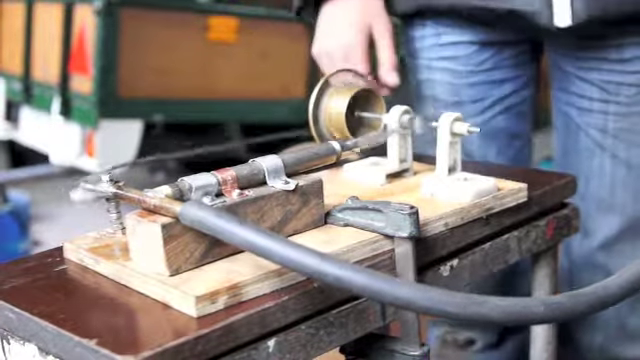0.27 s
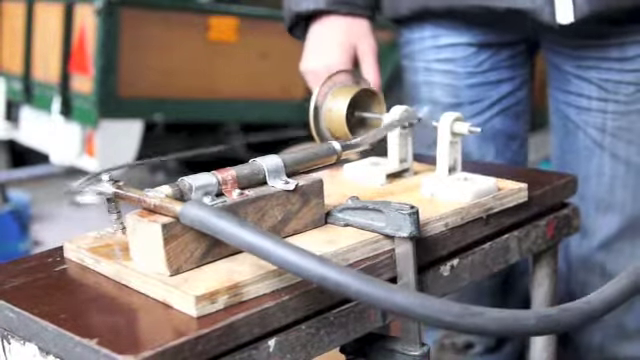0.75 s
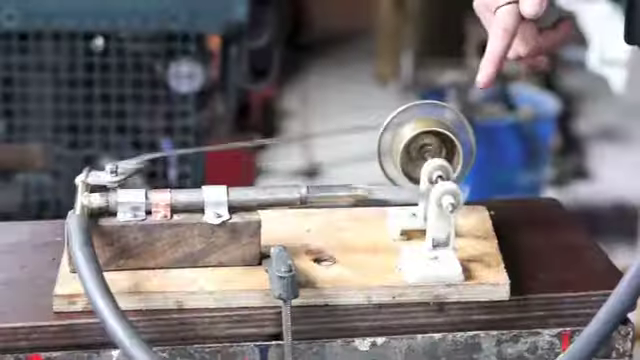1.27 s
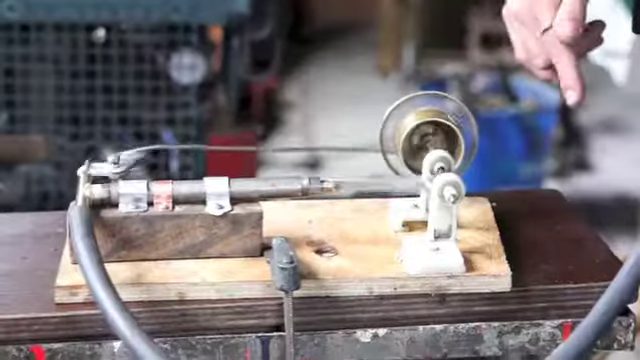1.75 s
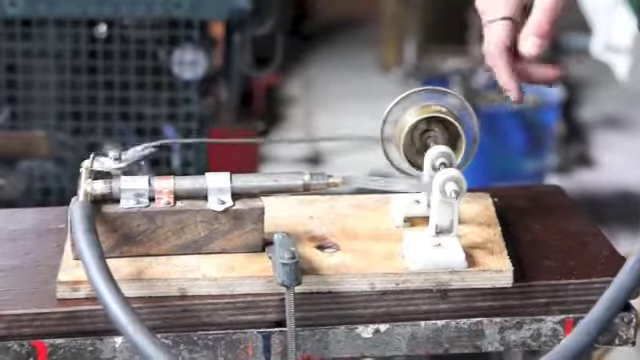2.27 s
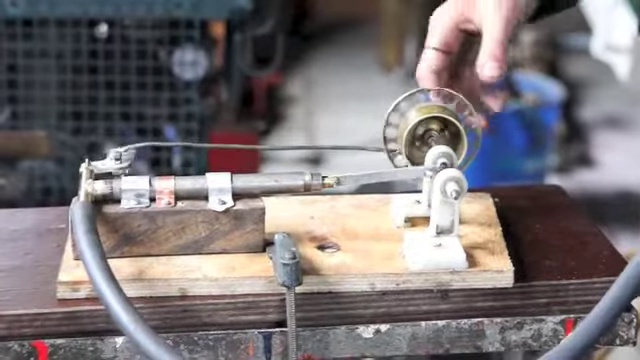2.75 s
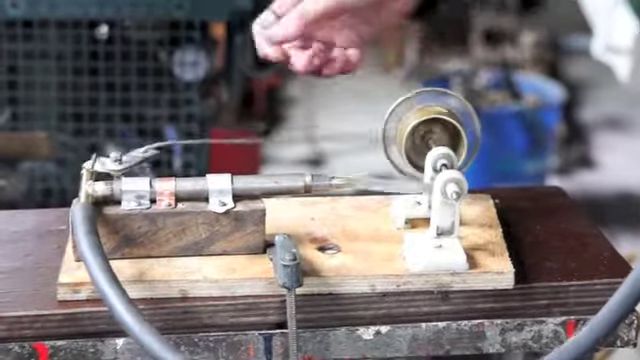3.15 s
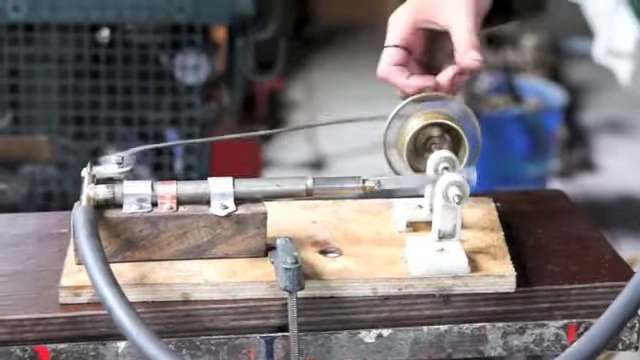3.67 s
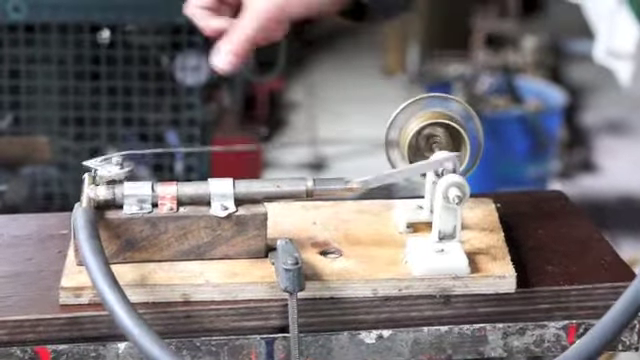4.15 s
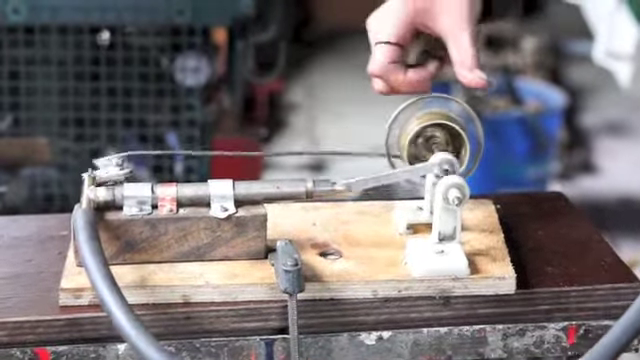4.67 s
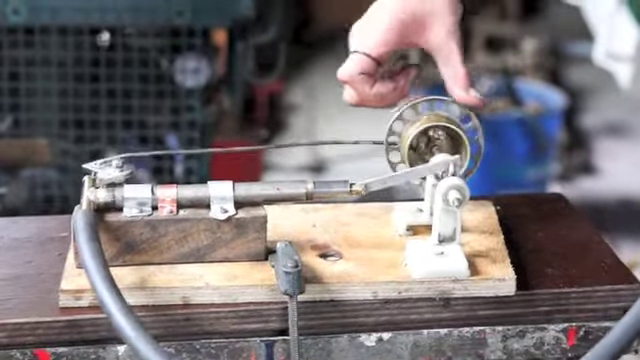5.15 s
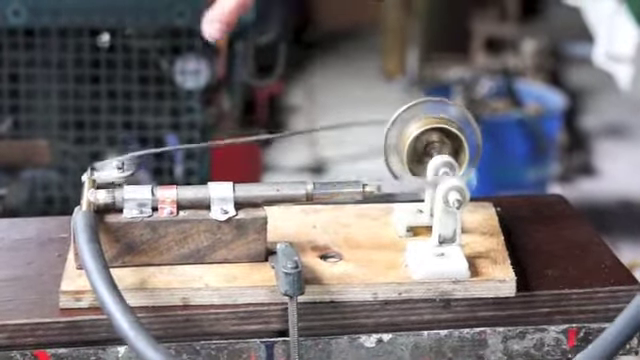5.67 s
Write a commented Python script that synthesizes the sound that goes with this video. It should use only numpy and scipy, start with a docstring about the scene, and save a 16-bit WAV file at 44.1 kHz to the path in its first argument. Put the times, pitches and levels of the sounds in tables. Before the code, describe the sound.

A homemade single-cylinder engine on compressed air, close up in a workshop. For almost a second it races at about eight turns a second, sputtering and knocking. Sound dips nearly to nothing, then it labours: puff, loose metal rattle, hollow rasp and a high squeak per stroke, slowing into two stalls with only leaking hiss. A long stroke hangs late, then quick turns resume. Close stereo microphone, soft reflections.

```python
"""A homemade single-cylinder engine runs on compressed air, clamped to a workshop table.
It races at first, with sputtering air made of sliding resonances; then all sound dips briefly.
Next it labours: each turn has a noise puff, a rattle of random contacts, a hollow rasp and a short squeak.
It stands still twice, leaving the hiss of leaking air, and once a stroke hangs midway before it turns on.
Soft reflections of the workshop and a faint room noise lie around it all."""
import sys
import numpy as np
from scipy import signal
from scipy.fft import rfft, irfft, next_fast_len
from scipy.io import wavfile
from scipy.ndimage import map_coordinates

SR = 44100
rng = np.random.default_rng(int(sys.argv[2]) if len(sys.argv) > 2 else 0)


def inscribe(sig):
    """Save sig as 16-bit PCM at rate SR to the path in sys.argv[1].

    A 1-D sig is mono; a 2-D sig holds one channel per row.
    Samples are clipped to [-1, 1] before scaling.
    """
    pcm = np.round(np.clip(np.atleast_2d(sig).T, -1, 1) * 32767)
    wavfile.write(sys.argv[1], SR, pcm.astype(np.int16))


N = 260180
T = np.arange(N) / SR  # time of every sample in seconds

# Labouring turns. Each row: valve opens in seconds, stroke ends in seconds, then relative levels in dB
# of the puff, port whistle, rattle, piston rasp and squeak.
TURNS = [(1.016, 1.113, -26.5, -27.5, -37, -34, -42), (1.183, 1.261, -26.5, -34, -35.5, -34, -29),
         (1.349, 1.437, -28.5, -50, -35.5, -35, -40), (1.518, 1.604, -30, -32, -36, -38, -29),
         (1.694, 1.787, -29, -38, -34.5, -35, -22.5), (1.893, 2.001, -29.5, -32.5, -34.5, -33, -14.5),
         (2.122, 2.248, -34.5, -39, -36.5, -32.5, -14), (2.399, 2.594, -34, -42, -36.5, -30.5, -5.5),
         (3.069, 3.17, -30.5, -30, -34, -36.5, -27.5), (3.267, 3.358, -31, -50, -36, -34.5, -17.5),
         (3.462, 3.58, -30, -47, -35.5, -34.5, -13.5), (3.724, 3.895, -34.5, -38, -37, -31, -5.5),
         (4.163, 4.261, -32, -28.5, -39.5, -33.5, -22), (4.371, 4.485, -30, -45, -37.5, -33.5, -10),
         (4.614, 4.752, -30, -28.5, -38, -31.5, -7.5), (4.943, 5.369, -34.5, -47, -38, -27.5, -39),
         (5.414, 5.485, -26.5, -27.5, -32.5, -33.5, -45), (5.573, 5.664, -29, -33, -34, -36, -42),
         (5.731, 5.813, -29.5, -46, -34.5, -32.5, -29), (5.897, 5.98, -34, -46, -36, -35, -45)]
OPENS, ENDS, PUFF_DB, WHISTLE_DB, RATTLE_DB, RASP_DB, SQUEAK_DB = np.transpose(TURNS)
# Times when the flywheel stands still. Each row: start in seconds, end in seconds.
STALLS = [(2.72, 3.038), (4.0, 4.112)]
HANG_S = .3  # a stroke longer than this hangs midway

# The racing engine opens its valve at an even pace.
RACE_FIRST_S, RACE_TURN_S, RACE_END_S = 0.036, .1213, .93
RACE_OPENS = np.arange(RACE_FIRST_S, RACE_END_S, RACE_TURN_S)
RACE_THUMP_LAG_S = .022  # from each opening to the thump of the table
# Levels while racing. Each row: time in seconds, then relative levels in dB of the sputter,
# the bracket's ring and the rushing air.
RACE = [(0.0, -31.5, -37, -28), (0.2, -32, -30, -28), (0.3, -32, -41, -28), (0.66, -33.5, -40, -29),
        (0.734, -31.5, -31, -30), (0.79, -34, -44, -29), (0.888, -42, -47, -32.5), (0.9, -50, -53, -32)]
# Puffs of the racing turns, in order. Each entry: relative level in dB.
RACE_PUFF_DB = np.array([-25.5, -28.0, -26.5, -27.0, -30, -27.5, -28.5, -40])
# Fits of the port whistle while racing. Each row: time in seconds, relative level in dB.
RACE_WHISTLES = [(.065, -33), (.1, -33), (.18, -29), (.235, -20), (.372, -27), (.505, -34), (.61, -31),
                 (.655, -32), (.752, -34), (.882, -31)]

# Knocks that shake the linkage. Each row: time in seconds, relative level in dB.
KNOCKS = [(0.017, -15), (0.047, -17), (.102, -10.5), (0.228, -16), (.247, -19), (.262, -16), (.338, -17),
          (.404, -13.5), (0.462, -12.5), (.494, -17), (.624, -18.5), (0.653, -18), (.678, -16),
          (.711, -16.5), (.755, -22), (.84, -20), (1.019, -16), (1.939, -17), (2.147, -16.5), (3.317, -16),
          (3.783, -15.5), (4.153, -17), (4.422, -13.5), (4.661, -19), (4.96, -23), (4.994, -18),
          (5.362, -16.5), (5.402, -11.5)]
# Bright metal ticks. Each row: time in seconds, level in dB.
TICKS = [(.152, -30), (.462, -22), (.842, -22)]
# Gurgles of the air. Each row: start in seconds, length in seconds, first pitch in Hz, last pitch in Hz,
# level in dB.
GURGLES = [(.015, .04, 1250, 1000, -35), (.05, .04, 1300, 1200, -31.5), (.098, 0.031, 1350, 900, -29),
           (0.22, .03, 1400, 1100, -30), (.243, .03, 950, 1550, -30), (0.281, .035, 1900, 1750, -32),
           (.398, 0.056, 1248, 540, -32), (0.644, 0.031, 1397, 2010, -31), (.672, 0.031, 1100, 880, -34.5),
           (1.928, 0.021, 1750, 1500, -31), (3.77, 0.025, 901, 1110, -35), (4.413, .022, 1899, 1600, -33),
           (5.394, .045, 1105, 1500, -35)]

# Smooth colours of the noises. Each row: frequency in Hz, relative level in dB per Hz.
AIR_COLOUR = [(300, -35), (2000, 1.5), (4500, -1), (5600, 3), (6600, 4.5), (7800, 0.5), (8800, 6),
              (11500, 2.5), (13500, 3), (16000, 7)]
PUFF_COLOUR = [(400, -40), (2000, -15), (4600, -13), (5800, 2.5), (7500, -7), (11000, -5), (14300, -6.5),
               (15100, 7.5), (15600, 9.5), (16000, -7)]
RATTLE_COLOUR = [(30, -48), (70, -42), (100, -23.5), (150, -21), (220, -14.5), (300, -13), (480, -6),
                 (620, -6), (900, -3), (1800, 2.5), (2500, -3.5), (3800, -2), (5000, -6), (16000, -25)]
TUBE_COLOUR = [(140, -24), (220, -5), (300, -7), (420, -2), (1200, -2.5), (2000, -3.5), (3400, -0.5),
               (3900, -8.5), (4900, -5), (6300, -2.5), (7700, -5), (9000, -3), (10500, -6), (12500, -7),
               (16000, -14)]
LEAK_COLOUR = [(30, -40), (120, -17), (250, -8), (900, -18), (1500, -9), (2600, 4.5), (4500, -3.5),
               (5600, 1.5), (6600, 0.5), (9000, 4.5), (11500, 4.5), (13300, 8), (16000, 3)]
ROOM_COLOUR = [(30, -25), (120, -18.5), (280, 1), (900, 2.5), (1500, -0.5), (2500, -18), (16000, -44)]

# Resonances of the exhaust port, wooden base, air column, tube and leak, which stand out of those colours.
# Each row: frequency in Hz, width in Hz, relative level in dB.
PORT_MODES = [(5940, 120, 5.6), (6040, 91, 11.3), (10080, 37, 14.2), (14800, 360, 3.8)]
BOARD_MODES = [(386, 77, 0), (484, 31, 0), (914, 62, 7), (1113, 33, 2), (1520, 53, 0), (2780, 38, 5),
               (3000, 59, -1.5), (3490, 100, 2.5)]
COLUMN_MODES = [(3320, 300, 6.4), (6100, 750, 5.4)]
TUBE_MODES = [(577, 25, 11), (735, 22, 11), (1097, 51, 14.3), (1620, 61, 7.5), (2300, 90, 3),
              (2870, 55, 16.5), (3400, 43, 13), (3548, 33, 16.3), (4227, 34, 23.8), (4440, 40, 16.5),
              (5360, 120, 10.3), (5880, 58, 16.5), (6370, 51, 14.8), (6540, 100, 9.5), (7180, 70, 13.4),
              (8223, 70, 13.5)]
LEAK_MODES = [(2290, 130, 9.5), (7100, 200, 8), (7800, 210, 8), (12400, 160, 6), (12900, 230, 4.4),
              (13500, 250, 3.6)]
# Hollows between the tube's modes. Each row: frequency in Hz, width in Hz, relative level in dB.
TUBE_HOLLOWS = [(3110, 190, -9), (3900, 320, -7), (6100, 130, -7), (6950, 200, -6), (7600, 350, -5)]
# High overtones of the air column. Each row: frequency in Hz, width in Hz, relative level in dB.
OVERTONES = [(8780, 450, -12), (9180, 350, -13), (12500, 380, -12), (13300, 500, -21)]
# Resonances of the sputter. Each row: frequency in Hz, width in Hz, relative level in dB.
SPUTTER_MODES = [(697, 300, -6), (1064, 300, -4), (1304, 300, 0.5), (1550, 350, -4.5), (1953, 400, -8),
                 (2776, 720, -3), (3387, 700, 3.5)]

# Echoes of the squeak off nearby things. Each row: delay in seconds, level in dB.
SQUEAK_ECHOES = [(.011, -7), (0.025, -32), (.033, -16), (0.046, -21)]
# Difference between the two channels. Each row: frequency in Hz, relative side level in dB.
STEREO_WIDTH = [(100, -4), (1500, 0), (2500, -1), (4000, 1), (6000, -1), (7800, -3.5), (9300, 0.5),
                (10100, 4), (12000, 3), (14000, 4.5), (15500, -3)]
# A brief dip of all sound. Each row: time in seconds, level in dB.
DIP = [(.895, -2.5), (.915, -12), (.923, -33), (.932, -43), (.94, -19), (.955, -3.5)]

WHISTLE_HZ, BRACKET_HZ, SQUEAK_HZ = 10053, 2228, 7086
RACE_PAN_DB, PAN_DB = 1.6, .4  # left minus right, racing and labouring
ROOM_T60_S = 0.37  # time for the workshop's tail to fall by 60 dB
CUTOFF_HZ = 15780


def exhaust(air):
    """Air noise rushes through the valve; openings add puffs and whistles, with shorter puffs at speed."""
    rush = air * colour(turbulence(side_db=-7.0, flutter_db=1.7), AIR_COLOUR, PORT_MODES)

    opening = swells(RACE_OPENS, RACE_PUFF_DB, rise_s=0.015, fall_s=0.015)
    opening = opening + swells(OPENS, PUFF_DB, rise_s=0.013, fall_s=0.03)
    puffs = from_db(6) * opening * colour(turbulence(side_db=-6.5, flutter_db=-0.5), PUFF_COLOUR)

    blowing = swells(*np.transpose(RACE_WHISTLES), rise_s=0.018, fall_s=0.018)
    blowing = blowing + swells(OPENS, WHISTLE_DB, rise_s=0.017, fall_s=0.056)
    whistle = spread(lambda: singing(WHISTLE_HZ, width_hz=70), side_db=-10)
    return rush + puffs + from_db(-2.8) * blowing * whistle


def airflow():
    """Air flows along each stroke, with extra swells a fixed time before each opening and after each end."""
    flow_db, early_db, early_lead_s = -33.5, -36, 0.2
    late_db, late_db_per_s, late_lag_s = -37.0, 32, 0.43
    race_out_db, race_back_db = 0.5, -5

    strokes_on = [hold(start, end, attack_s=0.035, release_s=0.047) for start, end in zip(OPENS, ENDS)]
    flow = from_db(flow_db) * np.max(strokes_on, axis=0)
    early_swells = swells(OPENS - early_lead_s, early_db, rise_s=0.017, fall_s=0.03)
    # longer strokes give stronger late swells; a hanging stroke counts as a fixed time of movement
    moving_s = np.where(ENDS - OPENS < HANG_S, ENDS - OPENS, HANG_S / 2)
    late_levels_db = late_db + late_db_per_s * moving_s
    late_swells = swells(ENDS + late_lag_s, late_levels_db, rise_s=0.024, fall_s=0.045)

    # racing air beats twice a turn
    race = from_db(in_time(RACE)[2]) * (T < RACE_END_S)
    puff_change_db = RACE_PUFF_DB - np.median(RACE_PUFF_DB)
    out_beats = swells(RACE_OPENS, race_out_db + puff_change_db, rise_s=0.031, fall_s=0.021)
    back_beats = swells(RACE_OPENS + RACE_TURN_S / 2, race_back_db, rise_s=0.023, fall_s=0.028)
    racing_air = race * (1 + out_beats + back_beats)
    return np.sqrt(flow ** 2 + early_swells ** 2 + late_swells ** 2 + racing_air ** 2)


def piston(drag, climb):
    """Air noise rasps past the juddering piston; resonances climb as the air column shortens."""
    full_ring_db, judder_db, sweep_share, brighten_db_per_rise = -34.5, 0.77, 1.2, 30
    ring_share, waver = .18, .002

    rasp = glide(colour(turbulence(side_db=-9.5, flutter_db=1.2), TUBE_COLOUR, COLUMN_MODES), climb)
    # hard drag sets the tube ringing; its modes waver and rise a little
    tube = colour(colour(rasp, modes=TUBE_MODES), modes=TUBE_HOLLOWS)
    ringing = glide(rms_one(tube), ring_share * climb + waver * drift(25))
    share = np.clip(drag / from_db(full_ring_db), 0, 1)
    blend = np.sqrt(share) * ringing + np.sqrt(1 - share) * rasp

    # the overtones sweep furthest and brighten
    overtones = 0
    for hz, width_hz, db in OVERTONES:
        overtones = overtones + from_db(db) * spread(lambda: singing(hz, width_hz), side_db=-7)
    sweep = from_db(brighten_db_per_rise * climb) * glide(overtones, sweep_share * climb)
    judder = from_db(0.34 + judder_db * drift(130))
    return judder * drag * (blend + sweep)


def strokes():
    """The piston's drag builds after the valve opens; pitch climbs along the stroke unless it hangs."""
    lag_s, lag_share, build_s, overrun_s, freed_early_s, fade_s = .015, .14, 0.046, .012, 0.019, .035
    rise, hang_rise = .14, .008  # shares of the pitch
    drag, climb = np.zeros(N), np.zeros(N)
    for opens, ends, db in zip(OPENS, ENDS, RASP_DB):
        length = ends - opens
        moves = length < HANG_S
        start = opens + lag_s + lag_share * length
        end = ends + (overrun_s if moves else -freed_early_s)
        near = (T > opens) & (T < end + fade_s / 2)
        t = T[near]
        flanks = np.minimum((t - start) / build_s, (end - t) / fade_s)
        drag[near] += from_db(db) * np.clip(flanks + .5, 0, 1)
        travel = np.clip((t - start) / (end - start), 0, 1) ** 3  # climbs mostly late in the stroke
        climb[near] = rise * travel if moves else hang_rise
    return drag, climb


def linkage(rattle_db):
    """Loose rods make random contacts on the wooden base, which drones; sharp knocks add noise cracks."""
    chatter = spread(lambda: contacts(per_s=7000, size_db=3.0), side_db=-10.5)
    chatter = chatter * (1 + 0.82 * clatter(per_s=75, ring_s=0.0054))
    rattle = from_db(rattle_db + 2.0) * colour(rms_one(chatter), RATTLE_COLOUR, BOARD_MODES)

    # the clamped base only follows the rattle up to a point
    drone = singing(384, width_hz=60) + from_db(-12.5) * singing(235, width_hz=55)
    base = from_db(np.minimum(rattle_db, -34) - 16.0) * drone

    knocking = swells(*np.transpose(KNOCKS), rise_s=0.00053, fall_s=0.0045)
    crack = knocking * turbulence(side_db=-27, flutter_db=-1.0)
    cracks = from_db(-14.5) * colour(crack, RATTLE_COLOUR, BOARD_MODES) + from_db(-44) * crack
    return rattle + base + thumps() + cracks


def shaking(race):
    """Rattle level in dB: it builds around each opening, eases along the stroke and dies after it."""
    lead_s, ease_db, ease_s, race_db, stir_db = 0.03, 5.0, 0.3, -33.0, -15.0
    power = 0
    for start, end, db in zip(OPENS - lead_s, ENDS, RATTLE_DB):
        eased = 1 - np.exp(-(np.maximum(T - start, 0) / ease_s) ** 2)
        level = from_db(db - ease_db * eased) * hold(start, end, attack_s=0.051, release_s=0.042)
        power = power + level ** 2
    labouring = power * turning() * (T > RACE_END_S)
    # knocks stir up the loose parts
    stirred = from_db(stir_db) * swells(*np.transpose(KNOCKS), rise_s=0.0069, fall_s=0.023)
    return 10 * np.log10(labouring + (from_db(race_db) * race) ** 2 + stirred ** 2 + 1e-9)


def thumps():
    """The crank thumps the table once a turn: low tones and resonances follow the puff or rattle level."""
    lag_s, race_db, turn_db, follows = 0.05, -45, -56.5, 1.5
    thump_hz, undertone_hz, undertone_db = 205, 150, -8
    fast_db = race_db + RACE_PUFF_DB - np.median(RACE_PUFF_DB)
    fast = swells(RACE_OPENS + RACE_THUMP_LAG_S, fast_db, rise_s=0.0089, fall_s=0.014)
    slow_db = turn_db + follows * (RATTLE_DB - RATTLE_DB.mean())
    slow = swells(OPENS + lag_s, slow_db, rise_s=0.014, fall_s=.03)

    undertone = from_db(undertone_db) * np.sin(2 * np.pi * undertone_hz * T)
    knock = np.sin(2 * np.pi * thump_hz * T) + undertone
    table = (from_db(-17) * fast + from_db(-22) * slow) * singing(100, width_hz=55)
    return fast * knock + slow * singing(235, width_hz=70) + table


def squeaks():
    """Stick-slip at a stroke's end swells into a tone that arches in pitch and echoes off nearby things."""
    tone, waver = np.zeros(N), np.cumsum(drift(300)) / SR
    for s, db in zip(ENDS, SQUEAK_DB):
        grip = swell(s, rise_s=0.00444, fall_s=0.0084)
        on = grip > 0
        # the pitch sags by up to 140 Hz on both sides of the peak
        sag = np.cumsum(1 - swell(s, rise_s=0.0083, fall_s=0.0089)[on]) / SR
        cycles = SQUEAK_HZ * T[on] - 140 * sag + 75 * waver[on]
        tone[on] += from_db(db + 0.46) * grip[on] * np.sin(2 * np.pi * cycles)
    echoes = sum(from_db(db) * np.roll(tone, int(delay_s * SR)) for delay_s, db in SQUEAK_ECHOES)

    scrape = swells(ENDS, 0.4 * SQUEAK_DB, rise_s=0.0071, fall_s=0.033)
    partials = from_db(2.7 * drift(250) - 1) * singing(10860, width_hz=520)
    for hz, width_hz, db in [(14200, 600, -5.0), (7600, 290, -6.5), (3620, 200, -8.0)]:
        partials = partials + from_db(db) * singing(hz, width_hz)
    left_right = from_db(np.array([[1], [-1]]) * 1.7)
    return (tone + echoes + from_db(-27.0) * scrape * partials) * left_right


def sputter():
    """Racing air gurgles as noise-driven resonances slide in pitch; a thin bracket buzzes along."""
    slide = .09  # share of the pitch
    sputter_db, bracket_db, _ = in_time(RACE)
    bursts = sum(from_db(db + 3.1 * drift(130)) * singing(hz, width_hz) for hz, width_hz, db in SPUTTER_MODES)
    gurgle = from_db(sputter_db - 0.4) * rms_one(glide([bursts], slide * drift(35)))
    bracket = from_db(bracket_db - 2.5 + 1.3 * drift(110)) * singing(BRACKET_HZ, width_hz=40)
    return (T < RACE_END_S) * (gurgle + bracket)


def racing():
    """Strength of the racing engine: it partly follows the sputter's level and surges unevenly."""
    follows, lumps_db = .65, 1.2
    sputter_db, on = in_time(RACE)[0], T < RACE_END_S
    return on * from_db(follows * (sputter_db - sputter_db[on].mean()) + lumps_db * drift(59.8))


def gurgles():
    """The loudest gurgles of the air: a hollow resonance swells and slides in pitch."""
    out = 0
    for start, length, from_hz, to_hz, db in GURGLES:
        along = np.clip((T - start) / length, 0, 1)
        resonance = singing(from_hz + (to_hz - from_hz) * along, width_hz=330)
        out = out + from_db(db) * np.sin(np.pi * along) * resonance
    return out


def ticks():
    """Metal on metal gives sharp ticks: very short swells of bright noise."""
    tick_noise = colour(turbulence(side_db=-9, flutter_db=-0.5), AIR_COLOUR)
    return swells(*np.transpose(TICKS), rise_s=.001, fall_s=.006) * tick_noise


def turning():
    """1 while the engine moves, falling smoothly to 0 while the flywheel stands."""
    stalled = sum(hold(start, end, attack_s=0.025, release_s=.011) for start, end in STALLS)
    return np.clip(1 - stalled, 0, 1)


def leak():
    """Air seeps past the valve; the hiss rises in pitch before openings, and stalls add a rising hollow note."""
    wander, rise, stalled_share, flicker_db = .011, .17, .5, .7
    leak_db, hollow_hz, hollow_db, creep = -36.5, 1680, -56.5, .21
    hiss = colour(turbulence(side_db=-8.0, flutter_db=0.0), LEAK_COLOUR, LEAK_MODES)
    nearing = sum(hold(s, s, attack_s=.055, release_s=.01) for s in OPENS)
    freedom = stalled_share + (1 - stalled_share) * turning()
    hiss = glide(hiss, wander * drift(14) + rise * nearing * freedom)

    waited = sum(np.interp(T, stall, [0, 1], right=0) for stall in STALLS)
    hollow = (1 - turning()) * glide([singing(hollow_hz, width_hz=320)], creep * waited)
    return from_db(flicker_db * drift(30)) * (from_db(leak_db) * hiss + from_db(hollow_db) * hollow)


def room_tone():
    """Faint diffuse workshop noise, made from coloured random noise."""
    return from_db(-49.0) * colour(turbulence(side_db=3.0, flutter_db=.5), ROOM_COLOUR)


def workshop(x, early_db, tail_db):
    """Decaying noise acts as echo: quick ones off the small table with little bass, then a diffuse tail."""
    t = T[:SR // 2]
    out = x
    early, tail = (early_db, .08, .002, -7, 800), (tail_db, ROOM_T60_S, .015, -1, 80)
    for level_db, t60_s, delay_s, side_db, lowest_hz in [early, tail]:
        echo = spread(lambda: rng.standard_normal(len(t)), side_db)
        echo = echo * from_db(-60 * t / t60_s) * (t > delay_s)
        echo = signal.sosfilt(signal.butter(2, lowest_hz, "high", fs=SR, output="sos"), echo)
        echo /= np.sqrt(np.sum(echo ** 2, axis=1, keepdims=True))
        out = out + from_db(level_db) * signal.fftconvolve(x, echo, axes=1)[:, :N]
    return out


def stereo_image(x):
    """Stereo width varies with pitch: the difference between the channels is coloured."""
    mid, side = (x[0] + x[1]) / 2, (x[0] - x[1]) / 2
    return mid + from_db(-0.6) * colour(side, STEREO_WIDTH) * np.array([[1], [-1]])


def from_db(db):
    """Turn decibels into gain."""
    return 10 ** (np.asarray(db) / 20)


def rms_one(x):
    """Scale to unit power."""
    return x / np.sqrt(np.mean(x ** 2) + 1e-20)


def in_time(rows):
    """Each column of a curve at every sample."""
    s, *columns = np.transpose(rows)
    return [np.interp(T, s, c) for c in columns]


def colour(x, spectrum=((20, 0), (20000, 0)), modes=()):
    """Filter by a smooth spectrum with resonances on top; white noise keeps its power."""
    size = next_fast_len(N + 4096)
    f = np.fft.rfftfreq(size, 1 / SR) + 1e-3
    hz, db = np.transpose(spectrum)
    lift = 1
    for centre, width, peak_db in modes:
        lift = lift + (from_db(peak_db) ** 2 - 1) / (1 + (2 * (f - centre) / width) ** 2)
    gain = from_db(np.interp(np.log(f), np.log(hz), db)) * np.sqrt(np.abs(lift))
    gain = gain * (f < CUTOFF_HZ + 500)
    return irfft(rfft(x, size) * rms_one(gain), size)[..., :N]


def drift(rate):
    """Slow random wandering of unit power, with this many new values a second."""
    knots = rng.standard_normal(int(T[-1] * rate) + 2)
    return rms_one(np.interp(T * rate, np.arange(len(knots)), knots))


def spread(draw, side_db):
    """Two channels: a shared random source plus another that differs in sign between them."""
    return rms_one(draw() + from_db(side_db) * draw() * np.array([[1], [-1]]))


def turbulence(side_db, flutter_db):
    """Air noise whose level flutters quickly."""
    return rms_one(spread(lambda: rng.standard_normal(N), side_db) * from_db(flutter_db * drift(400)))


def singing(hz, width_hz):
    """A narrow resonance, steady or sliding, kept ringing by noise."""
    phase = 2 * np.pi * np.cumsum(hz + np.zeros(N)) / SR
    return rms_one(drift(width_hz) * np.cos(phase) + drift(width_hz) * np.sin(phase))


def glide(x, rise):
    """Raise all pitches by a moving share, by reading the sound faster."""
    reading = np.cumsum(1 + rise) % (N - 1)
    return np.array([map_coordinates(side, [reading], order=5) for side in x])


def contacts(per_s, size_db):
    """Tiny metal contacts at random times, of uneven strength."""
    sizes = from_db(size_db * np.minimum(rng.exponential(1, N), 4)) * rng.choice([-1, 1], N)
    return sizes * (rng.random(N) < per_s / SR)


def clatter(per_s, ring_s):
    """Loudness of loose parts that strike at random and die away."""
    fade = np.exp(-1 / (ring_s * SR))
    return signal.lfilter([1], [1, -fade], np.abs(contacts(per_s, size_db=0.5)) + 1e-18)


def swell(at, rise_s, fall_s):
    """A rounded rise to 1 at the given moment, then an exponential fall."""
    out, near = np.zeros(N), slice(*np.searchsorted(T, [at - 10 * rise_s, at + 10 * fall_s]))
    age = T[near] - at
    out[near] = np.exp(np.where(age < 0, -(age / rise_s) ** 2, -age / fall_s))
    return out


def swells(times, levels_db, rise_s, fall_s):
    """A row of swells, each with its own level or all alike."""
    return sum(gain * swell(s, rise_s, fall_s) for s, gain in np.broadcast(times, from_db(levels_db)))


def hold(start, end, attack_s, release_s):
    """Full between two moments, with exponential flanks."""
    out = np.zeros(N)
    near = slice(*np.searchsorted(T, [start - 10 * attack_s, end + 10 * release_s]))
    before, after = np.minimum(T[near] - start, 0), np.maximum(T[near] - end, 0)
    out[near] = np.exp(before / attack_s - after / release_s)
    return out


def scene():
    """The engine over its leaking air supply; the harder the piston drags, the less air escapes."""
    full_drag_db, rattle_choke_db, air_choke_db, leak_choke_db = -32.5, 2, 6, 3.5
    drag, climb = strokes()
    choke, race = drag / from_db(full_drag_db), racing()
    air = airflow() * from_db(-air_choke_db * choke)

    engine = turning() * exhaust(air) + piston(drag, climb)
    engine = engine + linkage(shaking(race) - rattle_choke_db * choke)
    engine = engine + sputter() + gurgles() + ticks()
    pan_db = np.where(T < RACE_END_S, RACE_PAN_DB, PAN_DB)
    placed = engine * from_db(pan_db * np.array([[.5], [-.5]]))

    leaking = from_db(-leak_choke_db * choke) * leak()
    heard = stereo_image(workshop(placed, early_db=-7, tail_db=-12) + leaking)
    return heard + workshop(squeaks(), early_db=-29, tail_db=-13.0) + room_tone()


def record(dry):
    """The level dips briefly once; a steep filter cuts the top."""
    dipped = dry * from_db(in_time(DIP)[0])
    return signal.sosfilt(signal.ellip(10, .2, 80, CUTOFF_HZ - 100, fs=SR, output="sos"), dipped)


dry = scene()
out = record(dry)
inscribe(out)
```